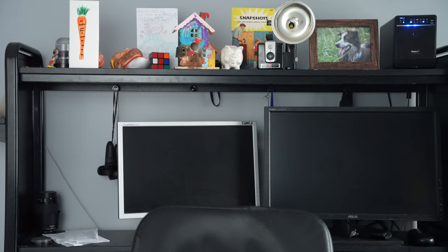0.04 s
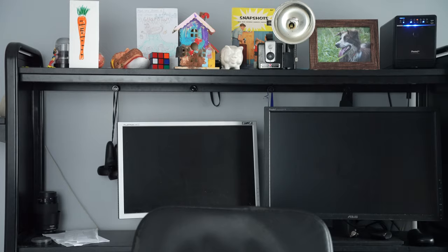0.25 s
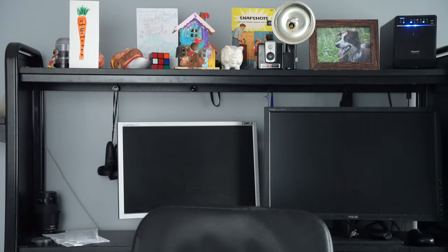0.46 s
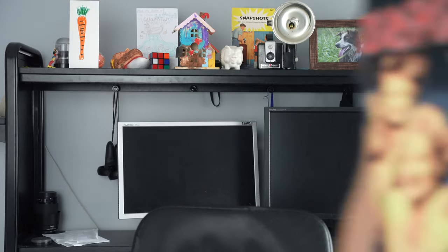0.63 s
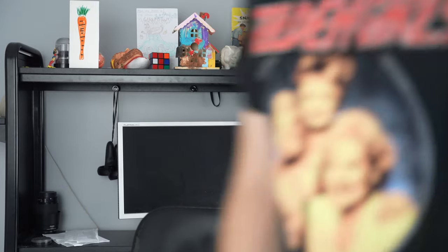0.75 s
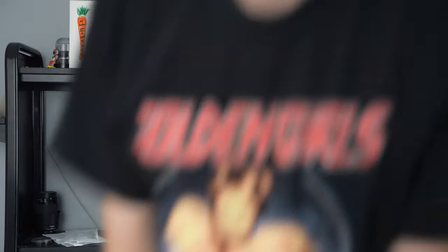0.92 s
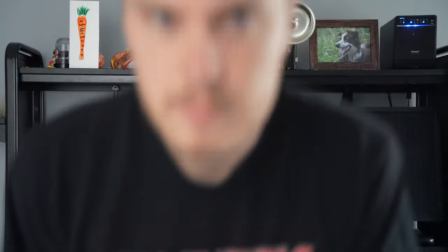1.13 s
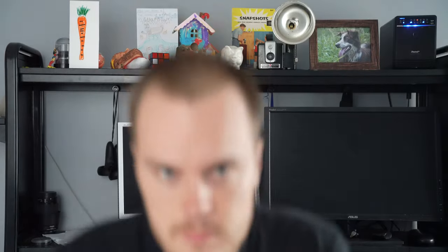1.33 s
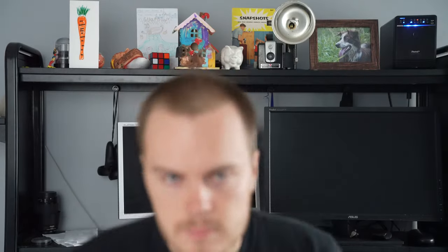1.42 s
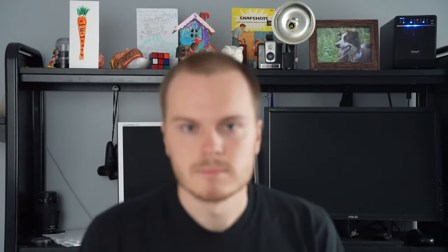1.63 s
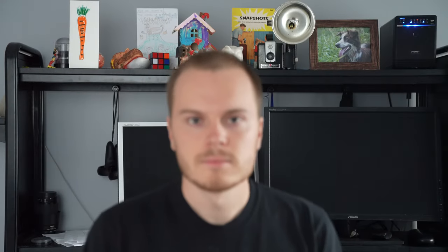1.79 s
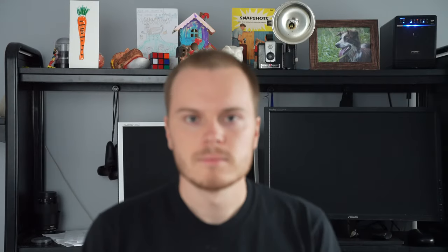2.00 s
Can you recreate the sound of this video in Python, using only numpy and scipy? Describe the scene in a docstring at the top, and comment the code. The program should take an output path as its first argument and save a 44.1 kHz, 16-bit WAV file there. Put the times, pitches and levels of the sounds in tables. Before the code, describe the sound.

A desk chair takes a person's weight with a sharp metallic clack, rattle and hollow double boom, after faint clothing rustle and soft floor creaks; tiny squeaks follow. Small quiet room, fan hum, close stereo microphones.

```python
"""A desk chair takes a person's weight in a small quiet room: the mechanism clacks and rattles, the frame
booms twice and small metal parts squeak, from filtered grains, ringing modes and rough narrow tones.
Before and during this, clothes rustle as fine coloured grains, and there are short creaks and soft low
swings through the floor. Fan noise and a mains hum lie below; a close stereo pair of microphones."""
import sys
import numpy as np
from scipy import signal
from scipy.fft import rfft, irfft
from scipy.io import wavfile
from scipy.ndimage import uniform_filter1d

SR = 44100
rng = np.random.default_rng(int(sys.argv[2]) if len(sys.argv) > 2 else 0)


def generate_wav(signal):
    """Clip the signal to [-1, 1] and save it as 16-bit WAV at the path in sys.argv[1]."""
    frames = np.transpose(np.atleast_2d(signal))
    scaled = np.clip(frames, -1, 1) * 32767
    pcm = np.round(scaled).astype(np.int16)
    wavfile.write(sys.argv[1], SR, pcm)


N = 90713
TIME_S = np.arange(N) / SR


def amp(db):
    """Decibels to linear gain."""
    return 10 ** (np.asarray(db) / 20)


def unit(x):
    """Scale a signal to rms 1."""
    return x / np.sqrt(np.mean(x ** 2) + 1e-20)


def in_time(rows):
    """Level curves in dB from rows of a time and levels; silent ahead of the first row."""
    time_s, *levels = np.transpose(rows)
    return [np.interp(TIME_S, time_s, level_db, left=-120) for level_db in levels]


def colour(x, points):
    """Filter a signal with a gain curve drawn over log frequency."""
    hz, db = np.transpose(points)
    freqs = np.maximum(np.fft.rfftfreq(x.shape[-1], 1 / SR), 1)
    gain = amp(np.interp(np.log(freqs), np.log(np.maximum(hz, 1)), db))
    return irfft(rfft(x) * gain, x.shape[-1])


def grains(per_s, spread_db):
    """Random clicks of uneven size and either sign, rms 1."""
    size = amp(spread_db * np.minimum(rng.exponential(1, N), 4))
    size = size * rng.choice([-1, 1], N)
    return unit(size * (rng.random(N) < per_s / SR))


def ring(clicks, hz, t60_s):
    """Two-pole resonator: a unit click sets a decaying sine of height 1 ringing."""
    radius = amp(-60 / (max(t60_s, .003) * SR))
    turn = 2 * np.pi * hz / SR
    # the tiny offset keeps the filter clear of denormal numbers
    return signal.lfilter([0, np.sin(turn)], [1, -2 * radius * np.cos(turn), radius * radius], clicks + 1e-18)


def ring_all(drive, modes):
    """Sum of resonators, one for each mode of a solid part."""
    return sum(amp(db) * ring(drive, hz, t60_s) for hz, db, t60_s in modes)


def body(drive, modes):
    """A part rung by its drive, scaled so that steady unit noise would give rms 1."""
    tick = np.eye(1, SR // 2)[0]
    norm = np.sqrt(np.sum(ring_all(tick, modes) ** 2))
    return ring_all(drive, modes) / norm


def rough_tones(rows, width):
    """Sine plus narrow noise at each pitch, swelling fast and dying away; width is bandwidth / pitch."""
    out = np.zeros(N)
    noise = rng.standard_normal((len(rows), N))
    for (start_s, length_s, hz, db), hiss in zip(rows, noise):
        u = np.maximum(TIME_S - start_s, 0) / length_s
        rough = unit(ring(hiss, hz, 2.2 / (width * hz)))
        tone = np.sin(2 * np.pi * hz * TIME_S) + .5 * rough
        swell = 8 * u * np.exp(-3 * u)  # peaks near 1 at a third of the length
        out += amp(db) * tone * swell
    return out


def wide(pair, side_gain):
    """Left and right from a mid signal and a side signal with its own gain curve."""
    side = colour(pair[1], side_gain)
    return np.array([pair[0] + side, pair[0] - side])


def background():
    """Steady fan and room noise, coloured and spread in stereo, over a centred sine of mains hum."""
    # fan and room noise spectrum: pitch_hz [Hz], density_db [relative dB per Hz]
    air_spectrum = [(12, -45), (25, -10.5), (60, -19.5), (90, -14), (120, -10), (160, -11), (320, -12.5),
                    (574, -19.5), (1000, -23.5), (1960, -33.5), (4000, -45.5), (8000, -44.5), (16000, -44)]
    # stereo spread of the noise: pitch_hz [Hz], side_gain_db [dB]
    air_width = [(60, -29), (110, -39), (200, -22), (380, -13), (700, -9), (1290, -4), (2380, -3),
                 (4400, 0.5), (8120, 0), (15000, 0)]
    air_db = -56.5  # rms of the mid above 150 Hz
    hum_hz, hum_db = 120, -54  # rms level
    noise = colour(rng.standard_normal((2, N)), air_spectrum)
    above_bass = signal.butter(4, 150, "high", fs=SR, output="sos")
    level = np.std(signal.sosfilt(above_bass, noise[0]))
    hum = amp(hum_db) * np.sqrt(2) * np.sin(2 * np.pi * hum_hz * TIME_S)
    return wide(amp(air_db) * noise / level, air_width) + hum


def clothing():
    """Dense fine grains of cloth sliding on cloth, a duller and a brighter part."""
    # rustle levels: time_s [s], mid_db [dB], treble_db [dB]
    rustle = [(0.03, -68.5, -72), (0.22, -69, -72.5), (0.386, -62, -65), (0.608, -63, -68.5),
              (0.67, -48.5, -62), (0.726, -57, -64), (0.752, -48.5, -59), (0.834, -63, -70.5),
              (0.958, -52.5, -61), (1.124, -61.5, -68.5), (1.31, -61, -65), (1.326, -49, -70),
              (1.332, -35.5, -35), (1.352, -48, -46), (1.368, -39, -41.5), (1.47, -43, -54),
              (1.502, -38.5, -40), (1.522, -33, -42.5), (1.558, -43.5, -49.5), (1.57, -41.5, -45.5),
              (1.694, -55.5, -68.5), (1.728, -55, -70), (1.742, -47, -68.5), (1.8, -54, -73),
              (1.9, -70, -90)]
    # spectra of the two parts: pitch_hz [Hz], density_db [relative dB per Hz]
    cloth_mid = [(200, -13), (400, -1), (1000, -3.5), (2000, -7), (3500, -14.5), (5000, -22.5), (8000, -80)]
    cloth_treble = [(2500, -18), (4000, -8), (6000, 1.5), (9000, -1.5), (12000, -9), (16000, -12)]
    mid_db, treble_db = in_time(rustle)
    slide = grains(9000, 3.17)
    dull = amp(mid_db) * unit(colour(slide, cloth_mid))
    bright = amp(treble_db) * unit(colour(slide, cloth_treble))
    return dull + bright


def creaks():
    """Short creaks of floor and chair: tones roughened by fairly narrow noise."""
    # creaks: start_s [s], length_s [s], pitch_hz [Hz], level_db [dB]
    creak_rows = [(.44, .022, 253, -45), (.47, .035, 253, -46), (.608, .017, 450, -49),
                  (.675, .03, 480, -54), (.733, .03, 2700, -61), (.745, .025, 1900, -58),
                  (.765, .03, 5600, -66), (.853, .035, 315, -45), (.883, .035, 250, -46),
                  (.912, .025, 740, -55), (.945, .035, 280, -52), (1.0, .03, 300, -52),
                  (1.49, .02, 6500, -51), (1.485, .029, 1060, -36), (1.745, .035, 180, -43),
                  (1.703, .033, 1620, -57), (1.735, .027, 2750, -59), (1.814, .012, 3300, -59)]
    return rough_tones(creak_rows, width=.08)


def thuds():
    """Soft pushes on the floor: a low swing or two that swells and fades."""
    # thuds: centre_s [s], level_db [dB ahead of the swing gain], pitch_hz [Hz],
    # length_s [s between the 1/e points], swing [gain; positive swings down through the centre]
    thud_rows = [(0.452, -39, 45, 0.024, -0.95), (.472, -30, 44, 0.031, 0.74),
                 (0.519, -42.5, 35, 0.038, -0.84), (0.768, -50, 64, 0.081, 0.8),
                 (0.945, -42.5, 45.3, 0.046, 1), (1.017, -42, 32.2, 0.1, 0.86),
                 (1.17, -50.5, 33.2, 0.091, 0.76), (1.41, -44, 40.4, 0.049, 1),
                 (1.465, -25.5, 50, 0.083, -0.61), (1.503, -44, 31, 0.05, -1),
                 (1.56, -47, 31.4, 0.076, 0.31), (1.658, -41, 60, 0.098, 0.75),
                 (1.776, -51, 51, 0.09, 0.91)]
    out = np.zeros(N)
    for centre_s, db, hz, length_s, swing in thud_rows:
        from_centre = TIME_S - centre_s
        swell = np.exp(-(2 * from_centre / length_s) ** 2)
        out -= swing * amp(db) * np.sin(2 * np.pi * hz * from_centre) * swell
    return out


def shaken(knocks, modes, level_db):
    """Modes kept ringing by a stream of knocks, evened in strength, then following the load."""
    even_s = 0.0295  # span of the running power
    x = body(knocks, modes)
    power = uniform_filter1d(x ** 2, size=int(even_s * SR))
    return amp(level_db) * x / np.sqrt(power + .1)  # the .1 keeps quiet gaps from being pulled up


def frame():
    """Irregular knocks inside the loaded chair ring its seat, back and upper part."""
    # shaking of the frame: time_s [s], seat_db [dB], back_db [dB], upper_db [dB]
    load = [(1.322, -44, -29, -47), (1.334, -38, -40, -75), (1.37, -27, -30.5, -68),
            (1.382, -26.5, -24.5, -38), (1.405, -34.5, -27.5, -41.5), (1.45, -32.5, -29, -38.5),
            (1.474, -43, -32.5, -55), (1.492, -43, -30.5, -27), (1.512, -37, -30.5, -33.5),
            (1.53, -35, -25.5, -30.5), (1.546, -28, -34, -32.5), (1.576, -32.5, -36, -44.5),
            (1.622, -50, -42, -45), (1.64, -41.5, -47.5, -46), (1.718, -65, -62, -58),
            (1.748, -46, -65, -62), (1.77, -48.5, -51.5, -53.5), (1.802, -62, -53.5, -69),
            (1.844, -68, -66, -68), (1.876, -65, -82, -59), (1.9, -61, -63.5, -78)]
    # modes of the three parts: pitch_hz [Hz], level_db [relative dB], t60_s [s]
    seat_modes = [(112, -14, 0.215), (148, -6, .1), (185.7, 3, 0.232)]
    back_modes = [(250.6, 2, 0.1), (283.2, -2.5, 0.16), (309.8, 1, 0.1), (347, -24, 0.12), (418, -16, 0.12)]
    upper_modes = [(504, -13.5, 0.059), (620, -11, 0.076), (708.6, 0.5, 0.053), (785, -0.5, 0.036),
                   (913, -0.5, 0.039), (1045, -1, 0.022), (1217, -4.5, 0.038), (1440, -4, 0.024),
                   (1716, -6.5, 0.029), (2155, -9.5, 0.025)]
    seat_db, back_db, upper_db = in_time(load)
    knocks = grains(400, 3.0)  # seat and back share their knocks
    low = shaken(knocks, seat_modes, seat_db) + shaken(knocks, back_modes, back_db)
    return low + shaken(grains(1200, 1.7), upper_modes, upper_db)


def mechanism():
    """Metal contacts, single clacks over a dying chatter: broad noise and ringing modes."""
    # chatter of the seat mechanism: time_s [s], level_db [dB]
    rattle = [(1.325, -56), (1.335, -35), (1.36, -33.5), (1.40, -40), (1.46, -53), (1.5, -77), (1.59, -67),
              (1.7, -72)]
    # separate clacks: start_s [s], level_db [dB]
    clacks = [(1.323, -21), (1.3295, -20), (1.332, -28), (1.335, -21.5), (1.342, -30), (1.346, -27),
              (1.349, -26), (1.387, -39), (1.492, -43), (1.566, -36)]
    # spectrum of the broad noise: pitch_hz [Hz], density_db [relative dB per Hz]
    rattle_spectrum = [(470, -38), (800, -36), (1400, -1.5), (2200, -1.5), (2980, -1), (3400, 5.5),
                       (5200, 1), (6500, -5.5), (9000, -4.5), (10500, -11), (11500, -21), (15700, -17)]
    # metal modes: pitch_hz [Hz], level_db [relative dB], t60_s [s]
    metal_modes = [(2340, -5, 0.045), (2648, 5.5, 0.024), (3257, 5.5, 0.054), (3475, 8.5, 0.034),
                   (4180, -5, 0.022), (4710, 4, 0.05), (5520, 5, .055), (8920, 6, 0.027), (9750, 4, 0.043)]
    clack_t60_s, metal_db = 0.012, -8
    chatter_db, = in_time(rattle)
    force = amp(chatter_db)
    for start_s, db in clacks:
        since = TIME_S - start_s
        force += amp(db - 60 * np.maximum(since, 0) / clack_t60_s) * (since >= 0)
    broad = unit(colour(grains(15000, 1.4), rattle_spectrum))
    metal = body(force * grains(5000, 2.3), metal_modes)
    return force * broad + amp(metal_db) * metal


def squeaks():
    """Thin squeaks of small metal parts: high tones with very narrow noise."""
    # squeaks: start_s [s], length_s [s], pitch_hz [Hz], level_db [dB]
    squeak_rows = [(1.571, .012, 12200, -49), (1.594, .016, 12200, -59), (1.616, .016, 12200, -59),
                   (1.583, .026, 9600, -54), (1.569, .014, 7900, -51), (1.822, .02, 4900, -63),
                   (1.86, .05, 4880, -70), (1.822, .025, 11300, -72), (1.893, .009, 11100, -65),
                   (1.904, .007, 7700, -70)]
    return rough_tones(squeak_rows, width=.01)


def room(x):
    """Direct sound and a decaying diffuse tail, thinner in the bass, mid and side."""
    # stereo spread: pitch_hz [Hz], side_gain_db [dB]
    room_width = [(60, -42), (110, -36), (200, -20), (380, -10), (700, -7), (1290, -3), (2380, 1.5),
                  (4400, 2), (8120, -1.5), (15000, -1)]
    t60_s, tail_db = 0.2, -8  # tail against direct sound, ahead of the bass cut
    bass_cut_hz = 500
    lean = -0.079  # direct sound in the side, ahead of its scaling; negative leans right
    t = np.arange(SR // 2) / SR
    tail = rng.standard_normal((2, len(t))) * amp(-60 * t / t60_s)
    tail *= amp(tail_db) / np.sqrt(np.sum(tail[0] ** 2))
    tail[0] = signal.lfilter(*signal.butter(1, bass_cut_hz, "high", fs=SR), tail[0])
    tail[:, 0] = 1, lean  # the first sample is the direct sound
    # the side gets the energy of the mid
    tail[1] *= np.sqrt(np.sum(tail[0] ** 2) / np.sum(tail[1] ** 2))
    pair = signal.fftconvolve(x[None], tail, axes=1)[:, :N]
    return wide(pair / np.sqrt(1 + amp(2 * tail_db)), room_width)


def scene():
    """Clothes, creaks and chair go through the room; thuds and background are added directly."""
    near = clothing() + creaks() + frame() + mechanism() + squeaks()
    return room(near) + thuds() + background()


def record(dry):
    """A short fade-in, then a steep low-pass that cuts the top."""
    fade_start_s, fade_end_s = 0.03, 0.056
    stop_hz = 16200  # 70 dB down from here up
    fade = np.interp(TIME_S, (fade_start_s, fade_end_s), [0, 1]) ** 2
    top_cut = signal.cheby2(16, 70, stop_hz, fs=SR, output="sos")
    return signal.sosfilt(top_cut, dry * fade)


dry = scene()
out = record(dry)
generate_wav(out)
```